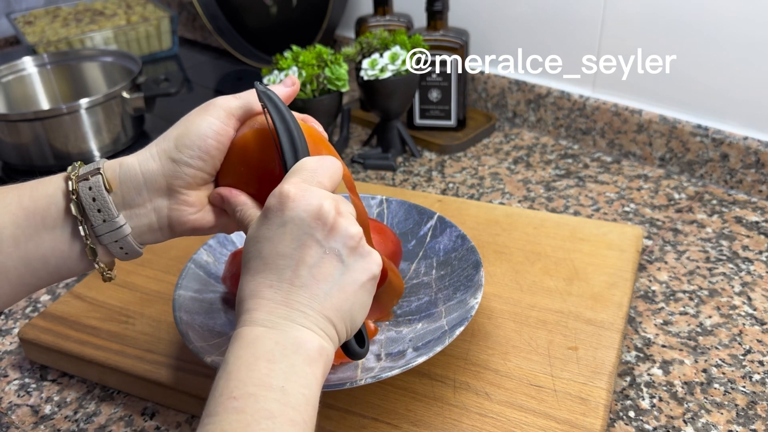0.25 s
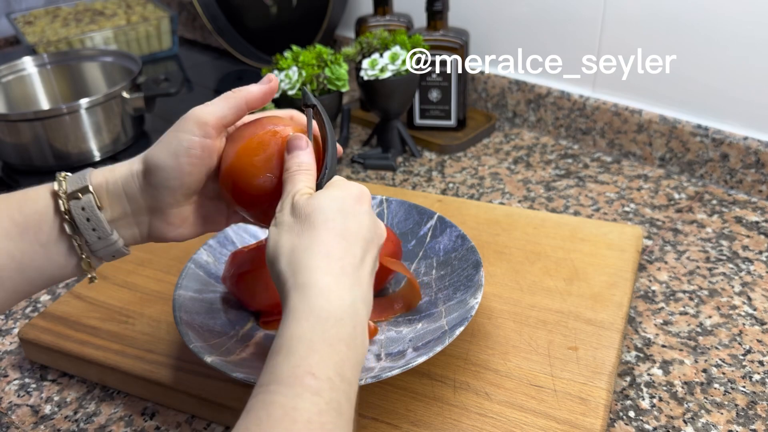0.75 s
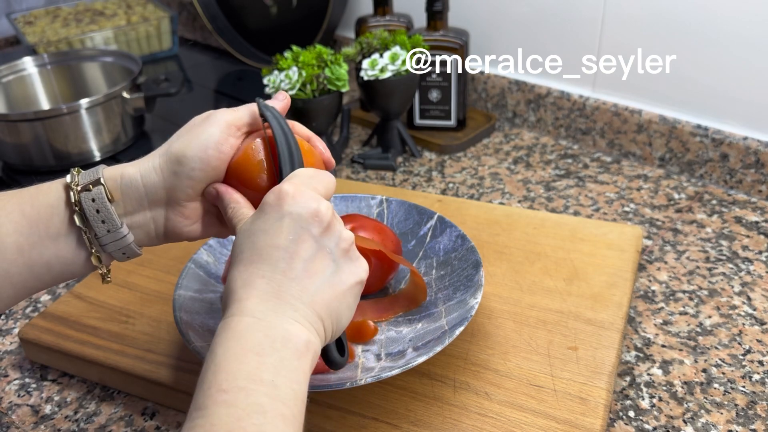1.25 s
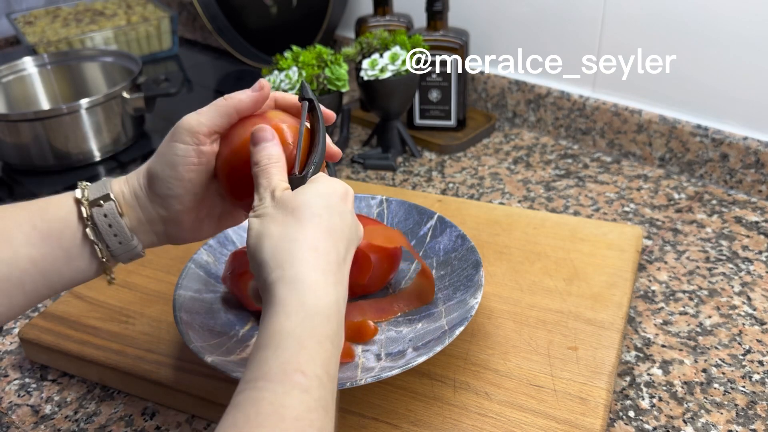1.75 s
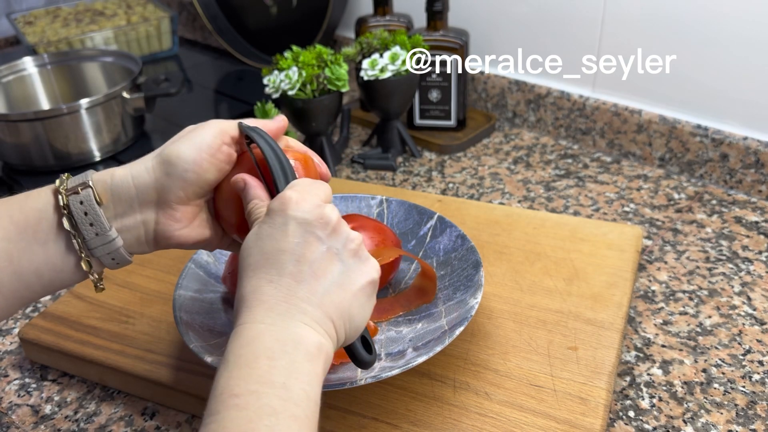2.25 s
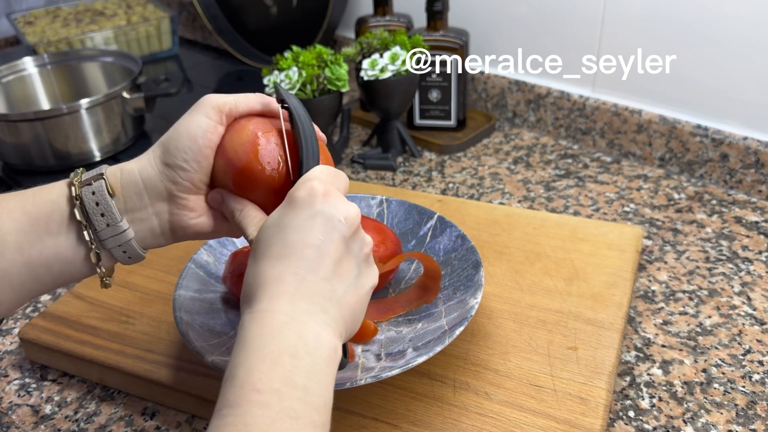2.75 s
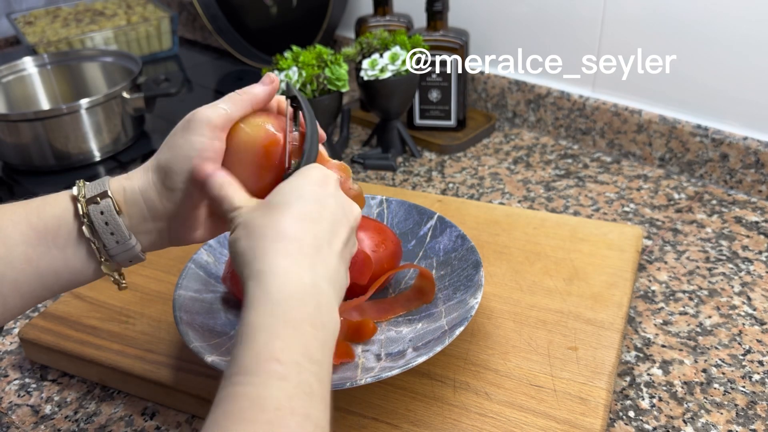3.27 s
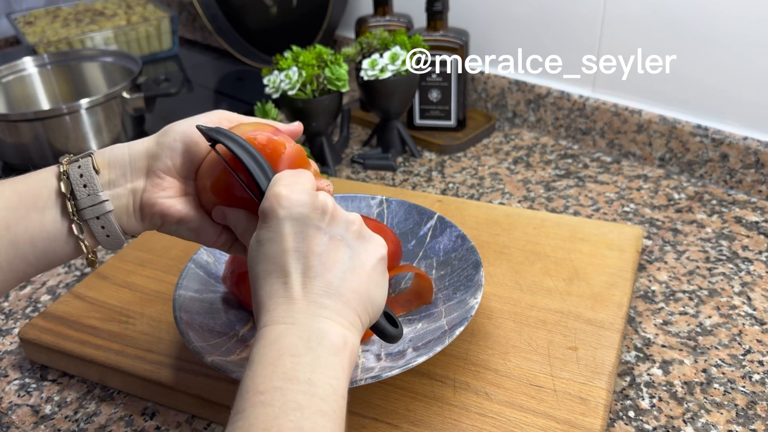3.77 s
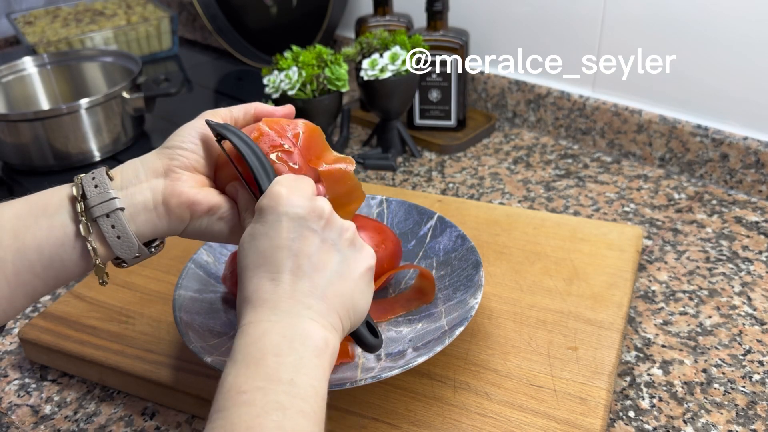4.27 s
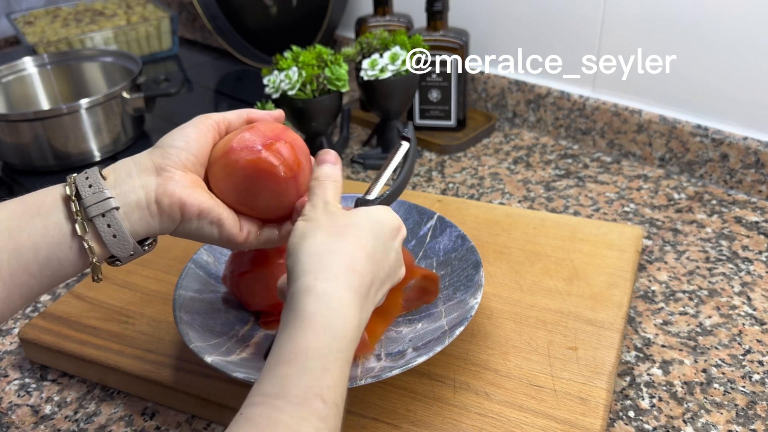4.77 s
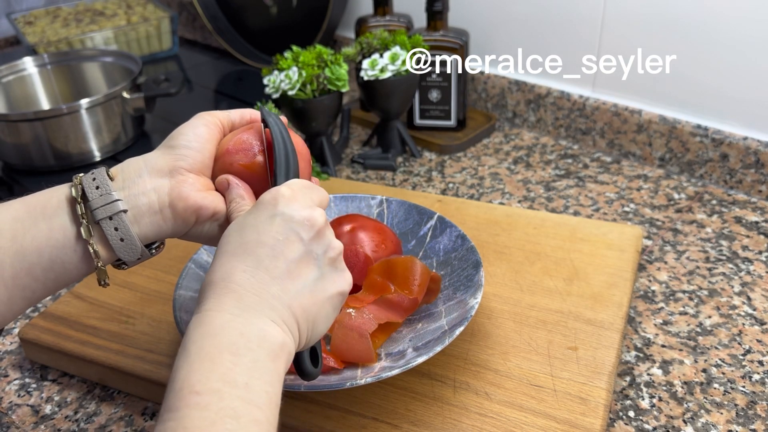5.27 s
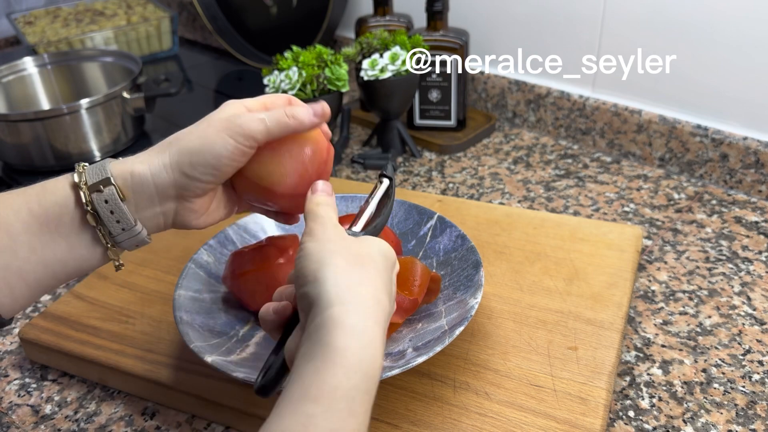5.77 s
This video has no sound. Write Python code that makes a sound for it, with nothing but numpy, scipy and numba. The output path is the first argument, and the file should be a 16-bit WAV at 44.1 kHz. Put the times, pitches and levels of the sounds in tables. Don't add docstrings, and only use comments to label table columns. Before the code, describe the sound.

Irregular groups of soft, wet peeling scrapes, some slightly squeaky, are heard half a metre from a phone microphone. Small metallic clicks punctuate them. A quick multiple-contact clink on a ceramic bowl is by far the loudest moment, past the middle, with a short ring. Lighter scrapes follow, then a distant creak and muffled door boom. Quiet refrigerator hum, faint hiss and a fine rapid device chirping lie underneath, with light tiled-room echo.

```python
import sys
import numpy as np
from scipy import signal
from scipy.fft import rfft, irfft, next_fast_len
from scipy.io import wavfile
from scipy.ndimage import uniform_filter1d
from numba import njit

SR = 44100
rng = np.random.default_rng(int(sys.argv[2]) if len(sys.argv) > 2 else 0)


def dump(signal):
    limited = np.clip(np.atleast_2d(signal).T, -1, 1)
    pcm = np.round(limited * 32767).astype(np.int16)
    wavfile.write(sys.argv[1], SR, pcm)


def how_loud(loudness_db):
    steps = np.asarray(loudness_db, float) / 20
    return 10 ** steps


N = 265482
LONG = next_fast_len(N)

# bite t/s, length t/s, rasp level/dB, change until let go level/dB, rasp centre f/Hz
CUTS = [(.46, 0.00164, -45, -11, 5910), (.496, 0.0031, -53, 3.5, 5500), (1.142, 0.0656, -50.5, 0.5, 5880),
        (1.22, 0.0565, -61, 0.5, 5910), (1.27, 0.0142, -52, -6, 4770), (1.452, 0.0103, -50, -4.5, 4770),
        (1.995, 0.0864, -65.5, 12.5, 6410), (2.212, 0.057, -57.5, -5, 6280), (2.774, .1, -50.5, 0, 6010),
        (2.885, 0.021, -48, -0.5, 5530), (3.745, 0.054, -57.5, -8.5, 5430),
        (4.238, 0.0294, -51, -1.5, 6630)]
SKIMS = [(2.175, 0.0035, -49, -3, 6400), (2.654, .002, -65, 8.5, 6400), (2.68, 0.0265, -61.5, -4.5, 5440),
         (2.94, 0.045, -58.5, -10, 6120), (3.718, 0.0133, -55, -5.5, 5140), (4.21, 0.0305, -47.5, 0, 6110),
         (5.05, .002, -53, 2, 3360), (5.098, .002, -73.5, 0, 3450), (5.255, 0.044, -64, -0.5, 6230),
         (5.35, 0.0308, -42, -2.5, 5990)]
SCUFFS = [
    (4.466, 0.0242, -69, 10.5, 4570),
    (5.229, .002, -52, 2.5, 4180),
]
DRAGS = [(1.34, 0.0906, -61, 0.5, 4460), (1.48, 0.019, -65, -7.5, 4470), (3.6, 0.0575, -65.5, 3, 6350),
         (3.674, 0.031, -69.5, 9.5, 6070), (3.745, 0.0482, -54.5, 3, 3620)]
# rows, flesh re rasp level/dB, handle re rasp level/dB, focus (0-1)
KINDS = [
    (CUTS, -1.95, -12.5, 0.578),
    (SKIMS, -5.5, -6, 0.558),
    (SCUFFS, 0.061, 1.5, 0.42),
    (DRAGS, -4.5, -6.5, 0.827),
]
# t/s, peak level/dB, pitch f/Hz, top re peak level/dB
SLIPS = [(.4545, -46, 6080, -30), (.4903, -42.5, 5580, -30), (1.1126, -51.5, 6770, -25),
         (1.144, -57, 5960, -28.5), (1.152, -49.5, 1150, -29.5), (1.164, -52.5, 5740, -33.5),
         (1.1922, -42.5, 6200, -37), (1.2284, -44, 5200, -28), (1.2722, -44, 4500, -23.5),
         (1.4508, -35.5, 4264, -44), (2.0405, -43, 6390, -38.5), (2.0768, -46, 2145, -28),
         (2.174, -45.5, 6870, -9.5), (2.177, -44, 1275, -27.5), (2.6554, -45.5, 7300, -27.5),
         (2.694, -46.5, 3010, -29.5), (2.7761, -43, 6220, -32.5), (2.892, -35.5, 6060, -31.5),
         (3.711, -49.5, 5420, -31.5), (4.2383, -47.5, 7170, -34.5), (4.24, -40.5, 3100, -30),
         (4.474, -49, 3120, -37), (5.061, -44, 3100, -30.5), (5.229, -39, 2460, -27),
         (5.3449, -33.5, 7340, -26.5), (5.6746, -57, 3140, -15.5)]
TICKS = [(1.051, -50, 6200, -26), (1.4283, -45.5, 4700, -31.5), (1.4494, -54.5, 4250, -37.5),
         (1.4933, -51.5, 4640, -31), (1.8014, -48, 5600, -32.5), (2.5057, -46.5, 7920, -30),
         (2.6798, -42, 6490, -27.5), (3.0007, -39, 8170, 7), (3.8987, -49, 7500, -9.5),
         (4.2117, -33, 6380, -36), (4.2174, -36.5, 5663, -26), (4.5076, -40.5, 2280, -14),
         (4.6608, -35, 3240, -6), (4.7004, -40, 3060, -32), (4.7424, -48.5, 3420, -25),
         (4.8518, -47, 2070, -21.5), (4.8908, -50, 3038, -25), (5.0473, -37, 3210, -9.5),
         (5.5049, -50, 6067, -26.5), (5.575, -46, 2230, -23.5)]
# t/s, level/dB, hardness (0-1)
CLINKS = [
    (4.5425, -19, 0.97),
    (4.544, -12, 0.56),
    (4.5485, -19.5, 0.82),
    (4.550, -23, 0.02),
    (4.5555, -25.5, 0.17),
    (4.566, -20.5, 0),
    (4.572, -30.5, 0),
]
# f/Hz, level/dB, t60 t/s
BOWL_MODES = [(483, -4.5, 0.0263), (768, 2, 0.02), (1327, -6, 0.0265), (1943, -10, .03),
              (2490, 10.5, 0.0165), (3277, -9.5, 0.039), (3540, -5.5, 0.041), (4183, -5, 0.064),
              (4343, -2, 0.063), (5089, 0.5, 0.043), (5150, -10.5, 0.0434), (6120, -7, 0.053),
              (6414, 4, 0.0394), (7580, 2, 0.034)]
RIM_MODES = [(2460, -8, 0.52), (3456, -3, 0.31), (4183, -0.5, 0.36), (4315, -6.5, .25), (5256, 1.5, 0.3),
             (6540, -5.5, 0.29), (6930, -4.5, 0.26), (7600, 4, 0.23)]
# t/s, length t/s, level/dB, change until it dies level/dB
THUDS = [
    (1.911, 0.0854, -58.5, 2),
    (5.709, 0.0333, -45, 1),
    (5.759, 0.183, -47, -16.5),
    (5.98, .002, -56, 0),
]
# f/Hz, width f/Hz, level/dB
PANEL_MODES = [(81.3, 42, -12), (144.7, 26.7, -3.5), (263.6, 18.7, -3.5), (320, 23.7, -7), (468, 48, -12),
               (595, 35.7, -2.5), (916, 100, -7), (1110, 64, -5.5), (1426, 120, -8.5)]
# t/s, f/Hz, level/dB, t60 t/s
LATCH = [
    (1.924, 1133, -67.5, 0.265),
    (5.608, 1110, -61, 0.31),
    (5.677, 1110, -52.5, 0.16),
    (5.702, 603.6, -37.5, 0.104),
    (5.707, 320, -41.5, 0.33),
    (5.745, 93.2, -37.5, 0.22),
]
# f/Hz, level/dB
HUM = [(101.56, -54.5), (93.36, -64.5), (44.1, -66.5)]
# f/Hz, density level/dB (per Hz)
AIR = [(28, -21.5), (42, -11), (62, -7), (90, 2), (125, -9.5), (650, -19), (1050, -29.5), (1650, -32.5),
       (4890, -38), (6040, -35), (8400, -46), (9200, -37), (11500, -48.5), (15600, -42)]
# f/Hz, width f/Hz, level/dB, start in frame t/s, length t/s
CHIRP = [(7604, 510, -72.5, 0.01985, 0.0159), (13340, 850, -113, 0.00325, 0.00142),
         (10580, 4200, -66, 0.0037, 0.00345)]
# f/Hz, left minus right level/dB, right leads (half turns),
# unrelated share (0-1)
PORTS = [(60, -1, -0.00093, .02), (302.5, 1, 0.119, 0.2), (701, 3.5, -0.325, 1), (1204, -2.5, 0.156, 1),
         (2460, -2, 0.413, 0), (3450, -5, 0.28, 0), (5210, -1, 0.24, 0),
         (5350, 0, 0, 0), (8050, 0, 0, 0), (8600, 0, -.5, .4), (9250, 0, -1, 0), (10250, 0, -1, 0),
             (11000, 0, -1.5, .3), (11700, 0, -2, 0), (13100, 0, -2, 0), (13600, 0, -2.4, .4),
             (14350, 0, -3, 0)]

BITE_DB_PER_S, RELEASE_DB_PER_S = 1207, 476.5
CREEP_DB, CREEP_DB_PER_S = -21, 259
SAG_HZ_PER_S = 2800
PUSH_DB_PER_DB = 0.54
BOARD_HZ, BOARD_DB, BOARD_DB_PER_DB = 559, -9, 1.23
RIM_DB, AIR_DB = -24, -51.5
FRAME_S = 1 / 30
ROOM_T60_S, ROOM_DB = 0.426, -14


def rasp():
    out = np.zeros(N)
    tearing = grit(3.61) * how_loud(2.52 * walk(190))
    for rows, flesh_db, kind_handle_db, focus in KINDS:
        for *timing, centre_hz in rows:
            a, b, t, db = stroke(*timing)
            grains = tearing[a:b]
            hz = np.clip(centre_hz - SAG_HZ_PER_S * (1 - focus) * t, 2500, 9000)
            handle_db = kind_handle_db + PUSH_DB_PER_DB * (db + 52.5)
            width = np.full(b - a, 0.115 + 0.436 * (1 - focus) ** 0.66)
            whistle = level(sweep(sweep(grains, hz, width), hz, width), 0)
            hiss = level(band_twice(grains, 5030, 0.59), 0)
            flesh = level(band_twice(grains, 889, 1.192), 1.08)
            handle = level(band_twice(grains, 2030, 0.79), 0.59)
            spray = level(band_twice(grains, 10190, 0.073), -8.5)
            board = level(band_twice(grains, BOARD_HZ, 0.3), BOARD_DB) * how_loud(BOARD_DB_PER_DB * (db + 45))
            blade = focus * whistle + (1 - focus) * hiss
            mix = blade + how_loud(flesh_db) * flesh + how_loud(handle_db) * handle + spray + board
            out[a:b] += mix * how_loud(db) * signal.windows.tukey(b - a, .1)
    return out


def grit(spread_db):
    size = np.minimum(rng.exponential(size=N), 5.5)
    return level(rng.standard_normal(N) * how_loud(spread_db * size), 0)


def stroke(s, length, db, change_db):
    a, b = int((s - .08) * SR), min(int((s + length + 0.2) * SR), N)
    t, length = np.arange(a, b) / SR - s, max(length, .001)
    before = np.maximum(BITE_DB_PER_S * t, CREEP_DB + CREEP_DB_PER_S * t)
    after = change_db * np.minimum(t / length, 1) - RELEASE_DB_PER_S * np.maximum(t - length, 0)
    return a, b, t, db + np.where(t < 0, before, after)


def slips():
    return bursts(SLIPS, rise=0.00405, t60=0.057, spread=1.0)


def ticks():
    return bursts(TICKS, rise=0.000172, t60=0.0164, spread=0.64)


def bursts(events, rise, t60, spread):
    out, t = np.zeros(N), np.arange(4096) / SR
    for s, db, hz, top_db in events:
        x = rng.standard_normal(len(t)) * (1 - np.exp(-t / rise)) * how_loud(-60 * t / t60)
        skirt_hz = hz ** (1 - spread) * 4000 ** spread
        body = 2.69 * band(x, hz, 0.08) + band_twice(x, skirt_hz, 1.48)
        top = band_twice(x, 9500, 0.8)
        burst = body / np.abs(body).max() + how_loud(top_db - 0.5) * top / np.abs(top).max()
        add(out, s - .001, how_loud(db) * burst)
    return out


def bowl():
    out, t = np.zeros(N), np.arange(SR // 5) / SR
    for s, db, hard in CLINKS:
        gains = rng.uniform(0.284, 3.4, len(BOWL_MODES)) * (-1) ** np.arange(len(BOWL_MODES))
        crack = band(rng.standard_normal(len(t)), 2320, 10.7) * how_loud(-6.5 - 60 * t / 0.019)
        struck = ring(BOWL_MODES, gains) + how_loud(RIM_DB) * ring(RIM_MODES, gains) + crack
        push = signal.lfilter([1], [1, -(1 - np.clip(hard, .02, 1))], struck)
        add(out, s, how_loud(db) * push / np.abs(push).max())
    rattle = band(rng.standard_normal(len(t)), 546, 1.59) * how_loud(-27 - 60 * t / 0.461)
    add(out, CLINKS[0][0], rattle)
    out = signal.sosfilt(signal.butter(3, [140, 8100], "band", fs=SR, output="sos"), out)
    return out + how_loud(-16) * echoes(out, cloud(0.066))


def ring(modes, gains):
    t = np.arange(SR // 5) / SR
    x = np.zeros(len(t))
    for (hz, db, t60), gain in zip(modes, gains):
        x += gain * how_loud(db - 60 * t / t60) * np.sin(2 * np.pi * hz * t)
    return x / np.abs(x).max()


def door():
    out, t = np.zeros(N), np.arange(SR // 4) / SR
    for thud in THUDS:
        a, b, _, db = stroke(*thud)
        panel = np.zeros(b - a)
        for hz, width_hz, mode_db in PANEL_MODES:
            panel += level(band(rng.standard_normal(b - a), hz, width_hz / hz), mode_db)
        out[a:b] += how_loud(db) * level(band(panel, 321, 1.23), 2.65)
    for s, hz, db, t60 in LATCH:
        swell = 1 - np.exp(-t / 0.0043)
        add(out, s, how_loud(db - 60 * t / t60) * swell * np.sin(2 * np.pi * hz * t))
    return out


def lens_motor():
    out, t = np.zeros(N), np.arange(N) / SR
    for hz, width_hz, db, start, length in CHIRP:
        frame, since = np.divmod(t - start + FRAME_S, FRAME_S)
        gate = np.sin(np.pi * np.clip(since / length, 0, 1))
        strength = how_loud(2.3 * rng.standard_normal(N // 1000))[frame.astype(int)]
        whirr = level(band_twice(rng.standard_normal(N), hz, width_hz / hz), db)
        out += gate * strength * whirr
    return out


def fridge():
    out, t = np.zeros(N), np.arange(N) / SR
    for hz, db in HUM:
        line = np.sin(2 * np.pi * hz * t + 1.24 * walk(4))
        out += np.sqrt(2) * how_loud(db + 0.4 * walk(3.303)) * line
    return out


def air():
    f = np.fft.rfftfreq(LONG, 1 / SR) + 1
    hz, db = np.transpose(AIR)
    spectrum = rfft(rng.standard_normal(LONG)) * how_loud(np.interp(np.log(f), np.log(hz), db))
    place = np.clip(np.log2(f / 60) / 1.5, 0, 5)
    out = np.zeros(N)
    for k in range(6):
        share = np.clip(1 - abs(place - k), 0, 1)
        out += irfft(spectrum * share, LONG)[:N] * how_loud(1.01 * walk(5.2))
    return level(out, AIR_DB)


def heard(near, leak):
    common = near + how_loud(ROOM_DB) * echoes(near, cloud(ROOM_T60_S))
    apart = echoes(near, cloud(0.026) + how_loud(ROOM_DB) * cloud(ROOM_T60_S))
    return ports(common, apart, leak)


def ports(common, apart, leak):
    hz, *columns = np.transpose(PORTS)
    f = np.fft.rfftfreq(LONG, 1 / SR)
    db, turns, share = (np.interp(f, hz, column) for column in columns)
    share = np.clip(share, leak, 1) / 2
    side = np.array([[1], [-1]])
    both = np.sqrt(1 - share) * rfft(common, LONG) + side * np.sqrt(share) * rfft(apart, LONG)
    turned = both * how_loud(side * db / 2) * np.exp(-.5j * np.pi * turns * side)
    return irfft(turned, LONG)[:, :N]


def cloud(t60):
    t = np.arange(SR // 2) / SR
    x = rng.standard_normal(len(t)) * how_loud(-60 * t / t60) * (t > .002)
    return x / np.linalg.norm(x)


def echoes(x, response):
    return signal.oaconvolve(x, response)[:N]


def level(x, db):
    return x * how_loud(db) / np.sqrt(np.mean(x ** 2))


def walk(rate):
    k = int(SR / rate)
    held = np.repeat(rng.standard_normal(N // k + 1), k)
    return uniform_filter1d(uniform_filter1d(held, k), k)[:N]


def add(out, s, x):
    i = int(s * SR)
    out[i:i + len(x)] += x[:N - i]


@njit
def svf(x, g, share):
    y, b, l = np.empty(len(x)), 0., 0.
    for i in range(len(x)):
        v = (b + g[i] * (x[i] - l)) / (1 + g[i] * (g[i] + share[i]))
        b, l, y[i] = 2 * v - b, l + 2 * g[i] * v, share[i] * v
    return y


def sweep(x, hz, share):
    return svf(x, np.tan(np.pi * hz / SR), share)


def band(x, hz, share):
    return sweep(x, np.full(len(x), 1. * hz), np.full(len(x), 1. * share))


def band_twice(x, hz, share):
    return band(band(x, hz, share), hz, share)


def scene():
    soft = rasp() + slips() + door()
    sharp = ticks() + bowl()
    still = ports(lens_motor() + fridge() + air(), air(), leak=0)
    return heard(soft, leak=0.0042) + heard(sharp, leak=0.088) + still


def band_limit(x):
    return signal.sosfilt(signal.butter(12, 14260, fs=SR, output="sos"), x)


def record(dry):
    return band_limit(dry)


dry = scene()
out = record(dry)
dump(out)
```